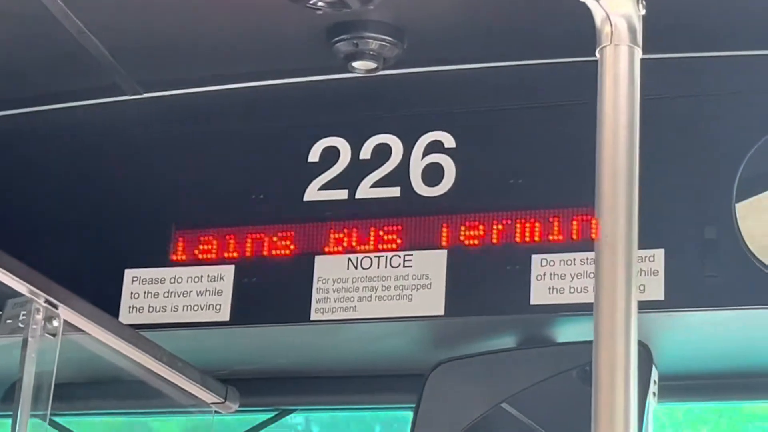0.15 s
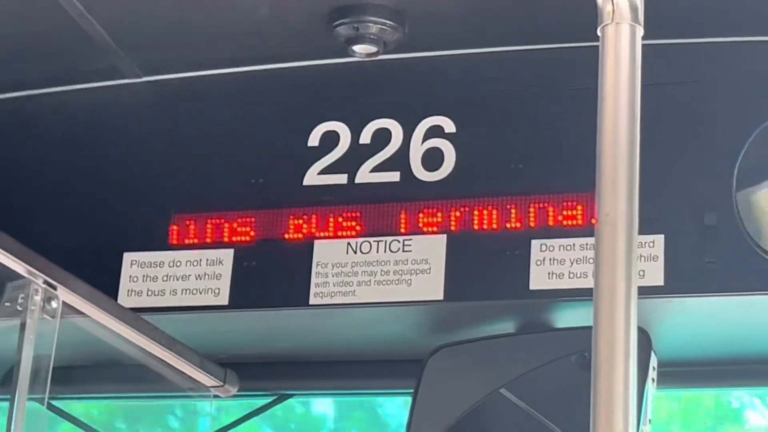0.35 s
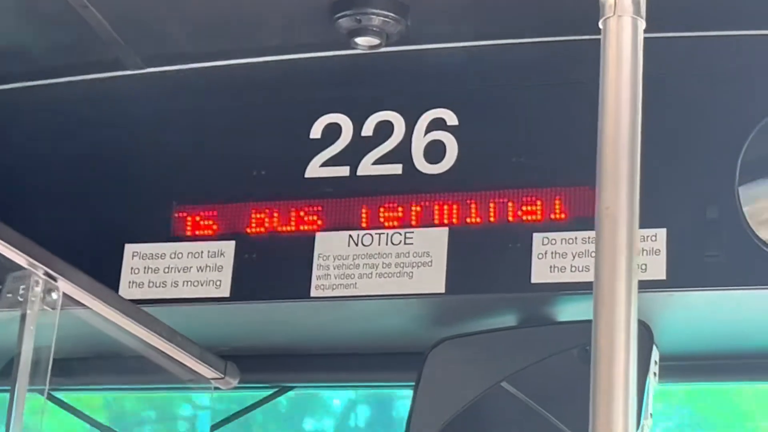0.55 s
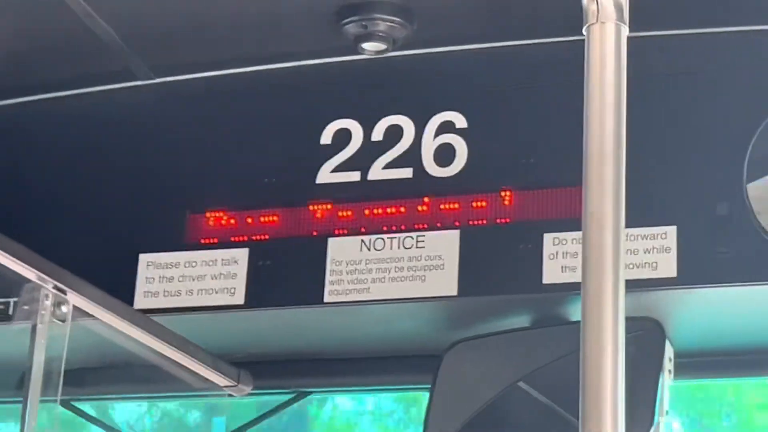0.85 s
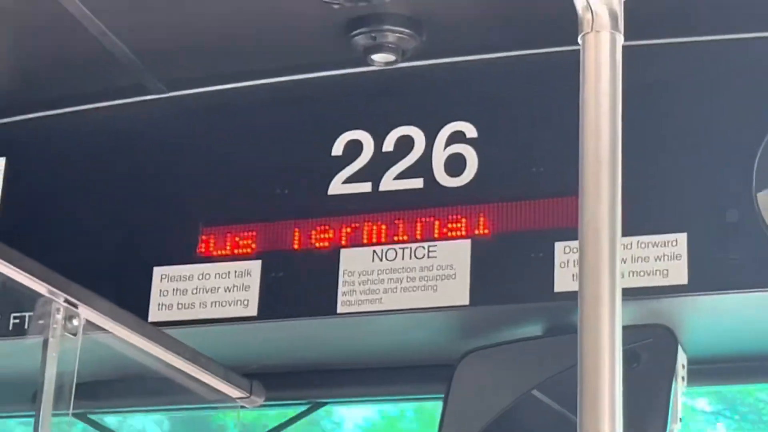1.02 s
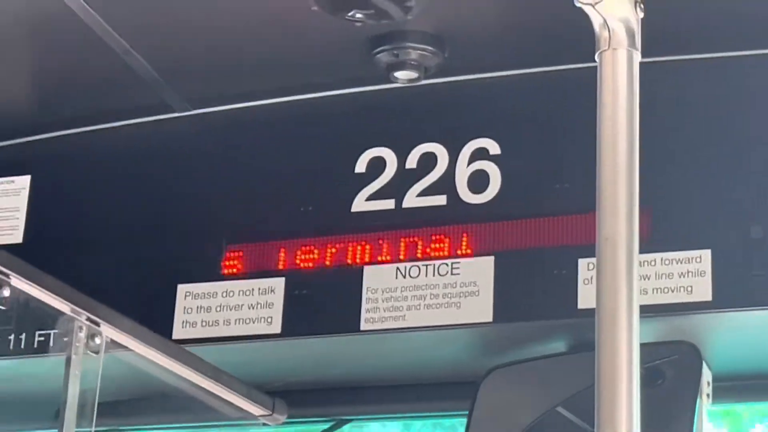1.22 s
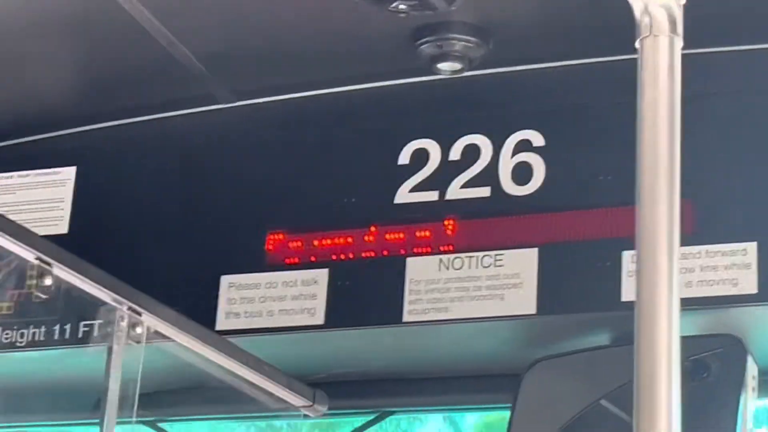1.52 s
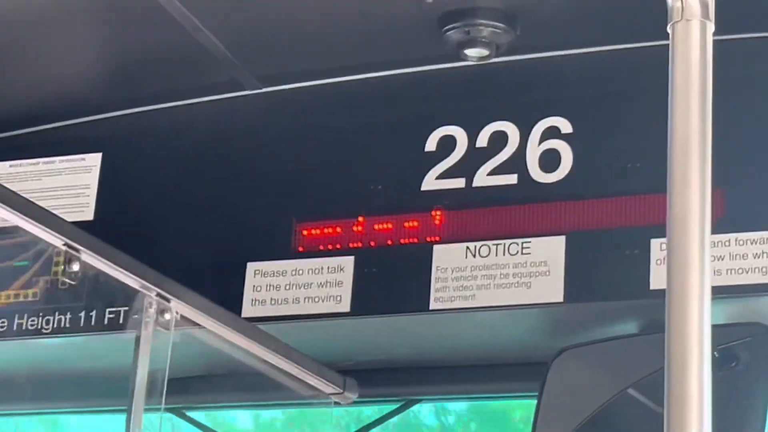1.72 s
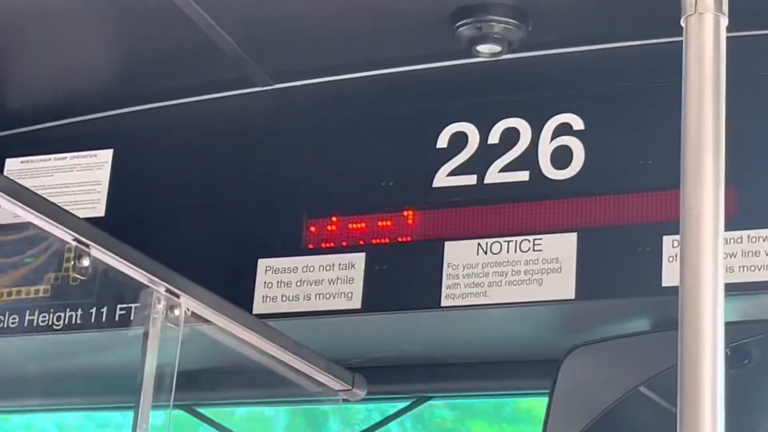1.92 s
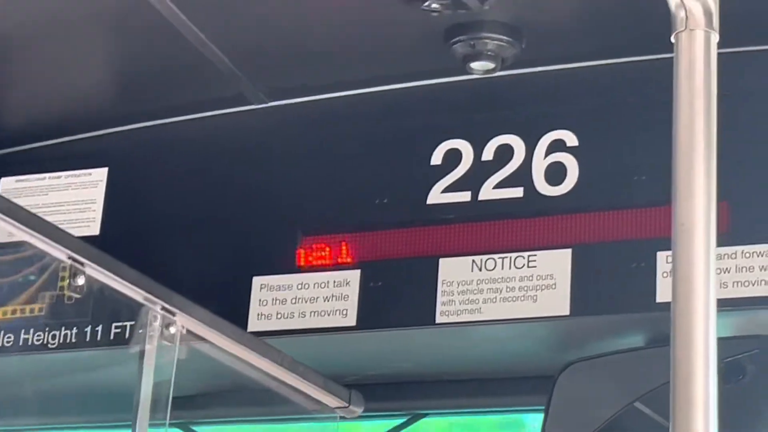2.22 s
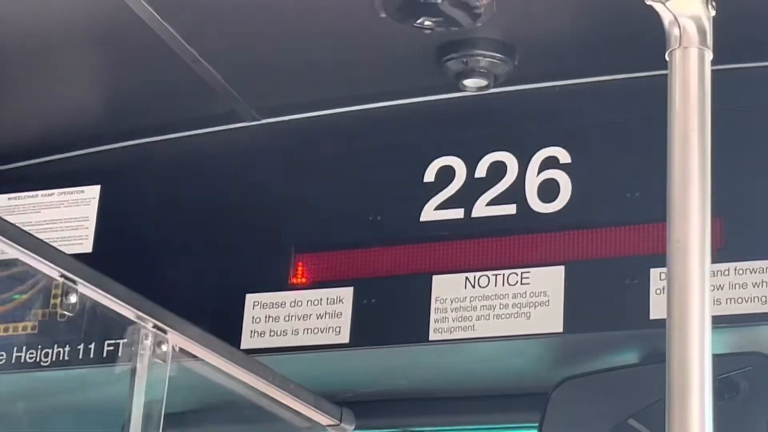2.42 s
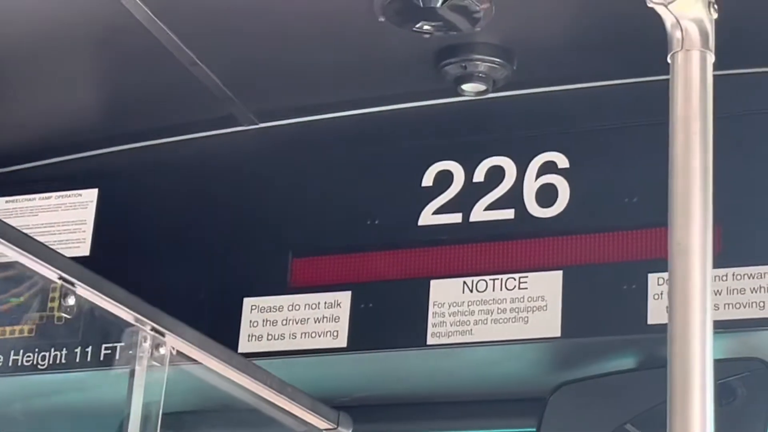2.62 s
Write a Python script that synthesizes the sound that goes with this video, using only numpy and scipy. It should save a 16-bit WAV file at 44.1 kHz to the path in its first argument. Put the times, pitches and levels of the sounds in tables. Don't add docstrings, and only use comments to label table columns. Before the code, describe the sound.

Bus cabin rumble heard on a handheld phone in stereo: bass-heavy engine drone, uneven road thuds and muffled tyre roar, then a short burst of chatter and dry squeaks, followed by smoother road and sharp metallic clicks.

```python
import sys
import numpy as np
from scipy import signal
from scipy.fft import rfft, irfft
from scipy.io import wavfile
from scipy.ndimage import uniform_filter1d

SR = 44100
rng = np.random.default_rng(int(sys.argv[2]) if len(sys.argv) > 2 else 0)


def invert_db(x):
    u = np.asarray(x, float) / 20
    return 10 ** u


def dump(signal):
    limited = np.clip(np.atleast_2d(signal).T, -1, 1)
    pcm = np.round(limited * 32767).astype(np.int16)
    wavfile.write(sys.argv[1], SR, pcm)


N = 121275
T = np.arange(N) / SR
HZ = np.maximum(np.fft.rfftfreq(N, 1 / SR), 1)

# t/s, f/Hz, level/dB
ENGINE_BOOM = [(0, 63.8, -25.5), (.3, 60.45, -30.5), (.58, 59.07, -25.5), (.84, 58.85, -25.5),
               (1.0, 61.2, -39), (1.2, 59.35, -26), (1.45, 59.3, -23.5), (1.6, 61.42, -31),
               (1.9, 59.04, -30), (2.1, 61.3, -22.5), (2.42, 59.76, -23), (2.6, 59.2, -28),
               (2.75, 60.2, -25.5)]
# t/s, f/Hz, level/dB
DRIVE_WHINE = [(0, 258, -40), (.6, 259.5, -36.5), (1.3, 260, -37), (2.1, 263, -36), (2.75, 261, -37)]
# t/s, f/Hz, level/dB
JOLTS = [(.007, 65.5, -23), (0.139, 70.7, -20.5), (0.191, 73.7, -17.5), (.418, 65.35, -23.5),
         (0.537, 65.3, -16), (.585, 55.1, -21.5), (.743, 72.7, -15.5), (.794, 63.5, -17), (.835, 63.1, -22),
         (1.15, 62.44, -18), (1.232, 55.4, -19.5), (1.295, 64.8, -21), (1.36, 69.95, -23.5),
         (1.41, 72.8, -12), (1.49, 60.6, -15), (1.528, 56.1, -14.5), (1.592, 58.6, -28), (1.635, 76.3, -15),
         (1.67, 66.6, -43), (1.772, 68, -18), (1.829, 61, -31), (1.95, 63.05, -30.5), (2.04, 64.8, -14),
         (2.117, 59.6, -13), (2.172, 66.5, -22), (2.288, 56.73, -21.5), (2.48, 62.54, -19),
         (2.535, 63.8, -13), (2.575, 62.9, -32), (2.608, 65.8, -15)]
# t/s, f/Hz, level/dB
THUMPS = [(0.071, 125.5, -25.5), (.285, 116.4, -22), (.34, 139, -25), (.57, 140, -24), (.705, 138, -27),
          (.92, 119, -23.5), (0.998, 113, -16.5), (1.136, 110.4, -18.5), (1.2, 137, -44),
          (1.265, 120.4, -29), (1.29, 250, -27.5), (1.33, 130, -33), (1.36, 320, -27), (1.385, 140, -16),
          (1.4, 193.5, -27), (1.44, 225.8, -30), (1.488, 140.5, -18), (1.531, 191, -23),
          (1.595, 136.4, -22), (1.65, 172.9, -22), (1.685, 110, -25.5), (1.725, 142.6, -36),
          (1.82, 119.5, -32), (1.88, 116.1, -18.5), (1.985, 112.7, -18.5), (2.09, 125.4, -19),
          (2.19, 111.6, -17), (2.446, 109.3, -20), (2.53, 111, -23), (2.57, 113.8, -25),
          (2.675, 116.7, -35)]
# t/s, floor shake level/dB, fittings chatter level/dB
ROAD_SHAKE = [(0, -24, -49.5), (.5, -23.5, -47.5), (.69, -23, -49.5), (.8, -23.5, -50),
              (1.17, -22.5, -43.5), (1.2, -22.5, -33.5), (1.245, -20, -42.5), (1.33, -15.5, -36.5),
              (1.41, -18, -36), (1.47, -16.5, -31.5), (1.54, -19, -33.5), (1.6, -22, -35.5),
              (1.66, -20.5, -34), (1.76, -20, -42), (1.98, -24, -45.5), (2.22, -22, -41), (2.4, -22, -41),
              (2.75, -23.5, -46)]
# t/s, level/dB, rise/s, t60/s
KNOCKS = [(.24, -52, 0.0066, .2), (.655, -42, 0.027, 0.27), (1.11, -49, .01, 0.16), (1.18, -58, .015, .3),
          (1.35, -44, 0.013, 0.58), (1.435, -41, 0.04, 0.26), (1.466, -34.5, 0.012, 0.32),
          (1.53, -40.5, 0.016, 0.12), (1.64, -46, 0.008, 0.21), (1.802, -34.5, 0.012, 0.37),
          (2.03, -49, 0.0166, 0.3), (2.12, -50, .03, .4), (2.228, -35.5, 0.018, 0.46), (2.37, -51, .01, .2),
          (2.47, -51, .01, 0.12), (2.56, -47, 0.0077, 0.12)]
# t/s, level/dB, rise/s, t60/s
TICKS = [
    (.655, -61, .002, 0.15),
    (1.47, -51, 0.00294, .15),
    (1.715, -52, .005, .1),
    (1.7505, -35.5, 0.0046, 0.34),
    (2.1925, -33, 0.00075, 0.27),
    (2.215, -40, .005, 0.28),
    (2.71, -46, 0.0018, .15),
]
# t/s, f/Hz, level/dB, rise/s,
# t60/s
PINGS = [(1.277, 3700, -43, .003, .3), (1.37, 6500, -47, .02, .25), (1.44, 7230, -46, .012, .2),
         (1.457, 5400, -40.5, .015, .3), (1.463, 3190, -37, .015, .3), (1.565, 3170, -41, .005, .08),
         (1.807, 6050, -36.5, .005, .2), (1.808, 3620, -43, .008, .2), (1.806, 10050, -35, .006, .07),
         (2.195, 10300, -33, .002, .05), (2.236, 9930, -38, .014, .1), (1.751, 12900, -43, .002, .04),
         (1.56, 6300, -47, .015, .2), (1.4, 3850, -47, .02, .2), (2.192, 12800, -36, .001, .03),
         (1.474, 10100, -39, .005, .08)]
# t/s, length/s, f/Hz, level/dB
SQUEAKS = [
    (1.27, .016, 1800, -26.5),
    (1.3, .03, 1820, -38),
    (1.355, .02, 1880, -23.5),
    (1.381, .014, 1880, -23.5),
    (1.405, .014, 1860, -31),
    (1.45, .01, 1830, -27),
    (1.478, .038, 1810, -27),
    (1.522, .012, 1810, -33),
    (1.545, .045, 1820, -37),
]
# multiple of the pitch, level/dB
SQUEAK_OVERTONES = [(1, -3), (2, -18)]
# f/Hz, width/Hz, level/dB
BRACKET_MODES = [(6750, 300, -28), (9100, 510, -11), (9200, 440, -8.5), (10030, 420, -10.5),
                 (10700, 530, -17)]
# f/Hz, width/Hz, level/dB
PANEL_MODES = [(312.2, 18.5, -39), (352, 5.8, -41.5), (436.5, 49, -41), (580.3, 7.8, -42), (670.5, 9, -51),
               (1840, 450, -44)]
# f/Hz, level/dB
CHATTER_COLOUR = [(700, 4.5), (1500, 3.5), (2500, -2), (4000, -6.5), (6000, -13), (9000, -17),
                  (11500, -23.5), (15500, -28)]
KNOCK_COLOUR = [(2000, -0.5), (4000, 1.5), (6500, 1.5), (9000, -12), (10500, -9.5), (12000, -7),
                (14000, -12), (16000, -16)]
TICK_COLOUR = [(4000, -6), (6500, 1), (8000, 6), (10000, 5), (11500, 2), (13300, 1.5), (14800, -2),
               (16200, -9)]
# f/Hz, level/dB
RUMBLE_COLOUR = [(20, -33), (32, -6.5), (48, 2), (62, -12), (90, 1), (115, -13), (170, -13), (230, -23)]
ROAR_COLOUR = [(150, 4.5), (230, 0), (400, 1.5), (600, -4), (900, -9.5), (1400, -13.5), (2200, -22.5),
               (3200, -30.5)]
HISS_COLOUR = [(1500, -20), (2500, 1), (4000, -1), (6000, -5.5), (8500, -15.5), (11000, -16.5),
               (14000, -27), (16000, -18)]
# f/Hz, likeness/0-1
PORT_LIKENESS = [(25, 0.95), (60, .995), (130, 1), (290, 0.56), (630, 0.67), (1300, 0.045), (1900, 0.52),
                 (3300, 1), (8000, 0.96)]
# f/Hz, left minus right level/dB
PORT_TILT = [(30, 1), (130, -3), (330, -0.5), (700, 1), (1200, -1.5), (1800, -7), (2500, -2), (3200, 0)]
# f/Hz, right leads by phase/rad
PORT_LEAD = [(0, 0), (2400, -.3), (3400, 0), (5000, 0), (5500, .9), (6200, 1.05), (6900, 1.45),
             (7580, 2.15), (7950, 2.95), (8300, 3.14), (8700, 3.26), (9000, 3.78), (10000, 4.71),
             (11050, 5.7), (11500, 6.12), (12060, 6.3), (12400, 6.62), (13780, 7.85), (15500, 9.42),
             (22050, 15.2)]


def drive():
    idle = invert_db(along(ENGINE_BOOM, 2) + 0.72 * walk(18))
    jolts = np.array([invert_db(db) * burst(start, rise=0.0193, t60=0.2288) for start, hz, db in JOLTS])
    size = np.sqrt(idle ** 2 + (jolts ** 2).sum(axis=0))
    pull = idle ** 2 * along(ENGINE_BOOM, 1) + np.array(JOLTS)[:, 1] @ jolts ** 2
    hz = pull / size ** 2 * (1 + 0.021 * walk(12.44))
    boom = tone(hz) * size
    octave = invert_db(-13.0 + walk(7.0)) * tone(2 * hz) * idle
    whine_hz = along(DRIVE_WHINE, 1) * (1 + 0.006 * walk(10.07))
    whine = tone(whine_hz) * invert_db(along(DRIVE_WHINE, 2) + 1.5 * walk(12))
    return boom + octave + whine


def thumps():
    return sum(invert_db(db) * tone(np.full(N, hz)) * burst(start, rise=0.011, t60=0.27) for start, hz, db in THUMPS)


def fittings():
    return chatter() + knocks() + ticks() + pings() + squeaks()


def chatter():
    level_db = along(ROAD_SHAKE, 2) + 3.5 + 0.49 * walk(21.89)
    return noise(CHATTER_COLOUR, 0.27, 12.8) * invert_db(level_db)


def knocks():
    jingle = sum(invert_db(db) * band(hz, width) for hz, width, db in BRACKET_MODES)
    return (noise(KNOCK_COLOUR, 0.8, 60) + jingle) * strikes(KNOCKS)


def ticks():
    return noise(TICK_COLOUR, 0.8, 60) * strikes(TICKS)


def pings():
    out = np.zeros(N)
    for start, hz, db, rise, t60 in PINGS:
        ring = tone(hz * (1 + 0.009 * walk(200)))
        out += ring * invert_db(db + 2.5 * walk(160)) * burst(start, rise, t60)
    return out


def squeaks():
    out = np.zeros(N)
    for start, length, f, db in SQUEAKS:
        fade_out = (start + length - T) / 3 + 0.0043
        gate = np.clip(np.minimum(T - start, fade_out) / 0.012, 0, 1)
        hz = f * (1 + 0.0062 * walk(140))
        voice = sum(invert_db(k_db) * tone(k * hz) for k, k_db in SQUEAK_OVERTONES)
        out += gate * invert_db(db + 1.5 * walk(150)) * voice
    return out


def road():
    shake_db = along(ROAD_SHAKE, 1)
    rumble = noise(RUMBLE_COLOUR, 0.31, 18.0) * invert_db(shake_db - 1.5)
    roar = noise(ROAR_COLOUR, 1.0, 9.38) * invert_db(-25)
    panels = sum(invert_db(db + 2.53 * walk(5.646)) * band(hz, width) for hz, width, db in PANEL_MODES)
    swell = invert_db(0.42 * (shake_db - shake_db.mean()))
    hiss = noise(HISS_COLOUR, 0.97, 11.0) * invert_db(-48)
    return rumble + swell * (roar + panels) + hiss


def along(table, col):
    points = np.array(table)
    return np.interp(T, points[:, 0], points[:, col])


def over_hz(table, hz=HZ):
    points = np.array(table)
    return np.interp(np.log(hz), np.log(points[:, 0]), points[:, 1])


def unit(x):
    return x / np.sqrt(np.mean(x ** 2))


def walk(rate):
    hold = int(SR / rate)
    steps = np.repeat(rng.standard_normal(N // 200)[:N // hold + 1], hold)
    slewed = uniform_filter1d(uniform_filter1d(steps, hold), hold)
    return 1.258 * slewed[:N]


def noise(colour, flicker_db, rate):
    low, high = colour[0][0], colour[-1][0]
    inside = (HZ > low / 1.5) & (HZ < high * 1.1)
    spec = rfft(rng.standard_normal((2, N))) * invert_db(over_hz(colour)) * inside
    out = np.zeros((2, N))
    for octave in np.arange(np.log2(low) - 1, np.log2(high) + 1, 0.5):
        slope = np.clip(1 - 2 * abs(np.log2(HZ) - octave), 0, 1)
        out += irfft(spec * slope, N) * invert_db(flicker_db * walk(rate))
    return unit(out)


def band(hz, width):
    resonance = 1 / (1 + (2 * (HZ - hz) / width) ** 2)
    return unit(irfft(rfft(rng.standard_normal((2, N))) * resonance, N))


def burst(start, rise, t60):
    out, first = np.zeros(N), int(start * SR)
    since = np.maximum(T[first:first + SR] - start, 0)
    attack = np.minimum(since / max(rise, 1e-4), 1)
    out[first:first + SR] = attack * invert_db(-60 * np.maximum(since - rise, 0) / max(t60, 0.01))
    return out


def strikes(table):
    shape = sum(invert_db(db) * burst(start, rise, t60) for start, db, rise, t60 in table)
    return shape * invert_db(walk(190))


def tone(hz):
    return np.sqrt(2) * np.sin(2 * np.pi * np.cumsum(hz) / SR - 1.6)


def scene():
    first, other = rfft(road() + fittings())
    likeness = np.clip(over_hz(PORT_LIKENESS), 0, 1)
    second = likeness * first + np.sqrt(1 - likeness ** 2) * other
    return irfft(np.array([first, second]), N) + drive() + thumps()


def top_cut(x):
    return signal.sosfilt(signal.butter(12, 15800, fs=SR, output="sos"), x)


def record(dry):
    mirrored = np.concatenate([dry, dry[:, ::-1]], axis=1)
    hz = np.maximum(np.fft.rfftfreq(2 * N, 1 / SR), 1)
    lead = np.interp(hz, *np.array(PORT_LEAD).T)
    half = invert_db(over_hz(PORT_TILT, hz) / 2) * np.exp(-0.5j * lead)
    ports = irfft(rfft(mirrored) * np.array([half, 1 / half]), 2 * N)[:, :N]
    return top_cut(ports)


dry = scene()
out = record(dry)
dump(out)
```